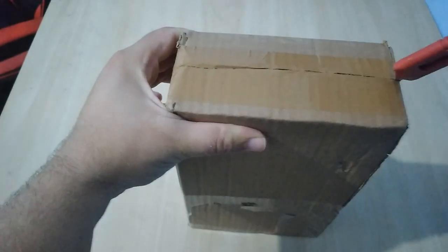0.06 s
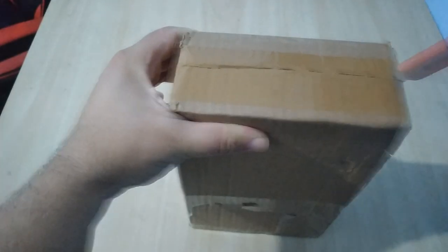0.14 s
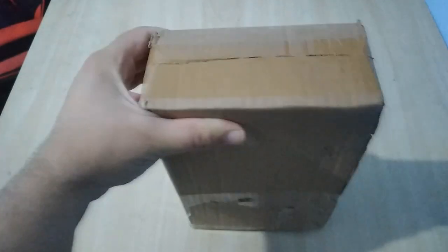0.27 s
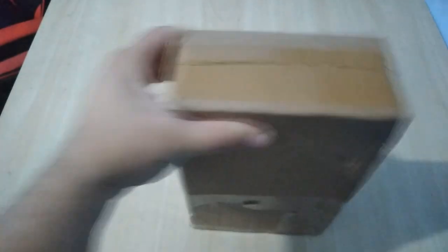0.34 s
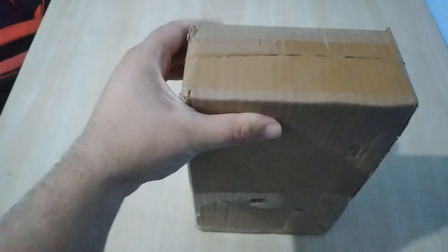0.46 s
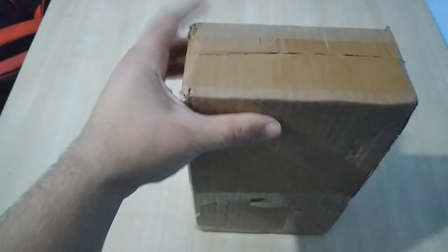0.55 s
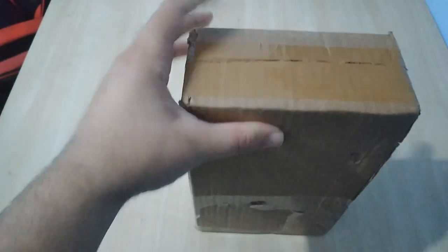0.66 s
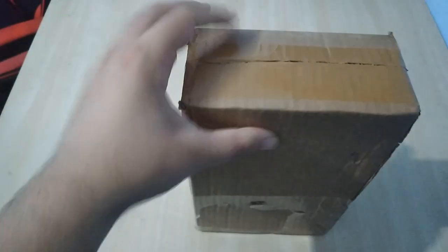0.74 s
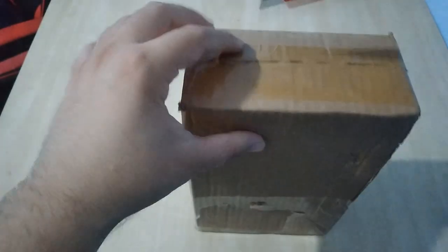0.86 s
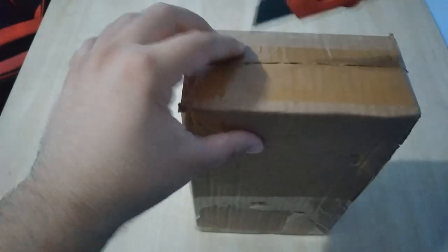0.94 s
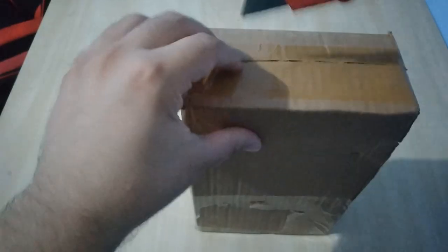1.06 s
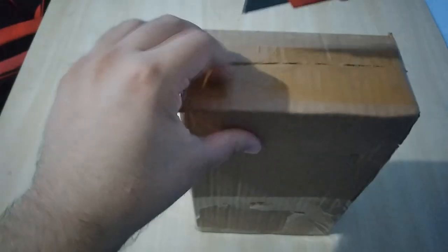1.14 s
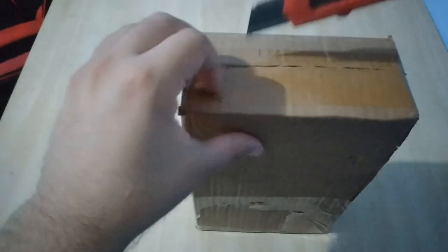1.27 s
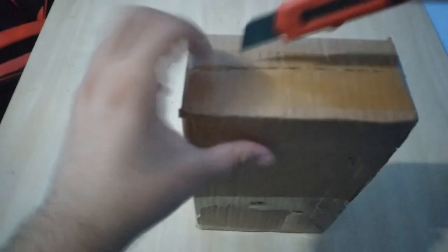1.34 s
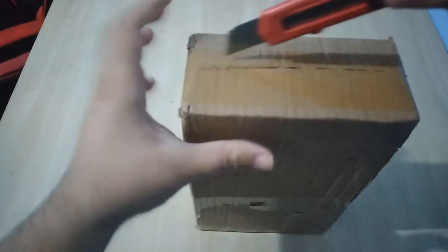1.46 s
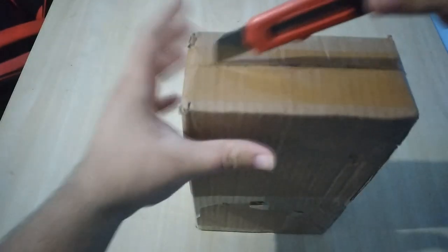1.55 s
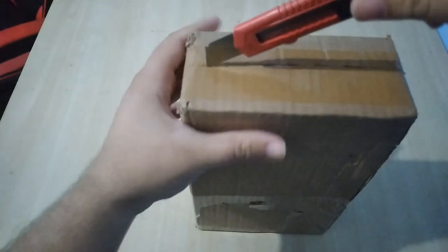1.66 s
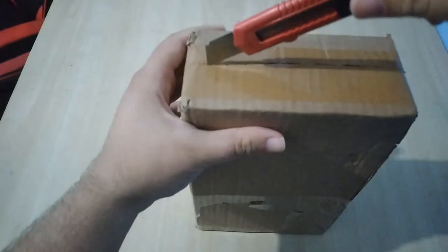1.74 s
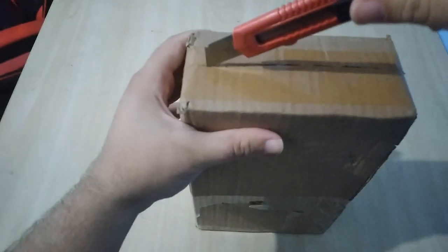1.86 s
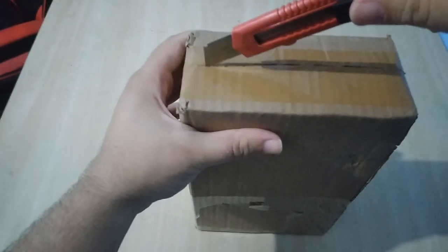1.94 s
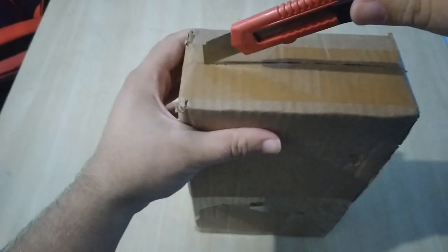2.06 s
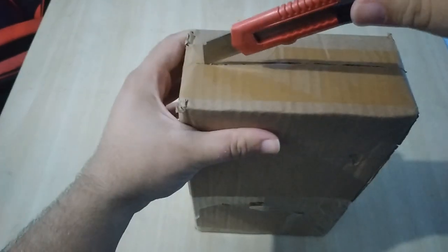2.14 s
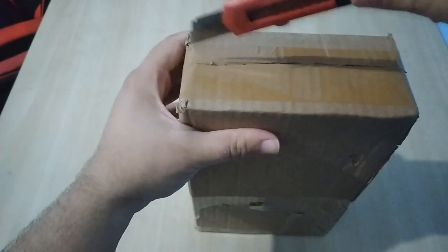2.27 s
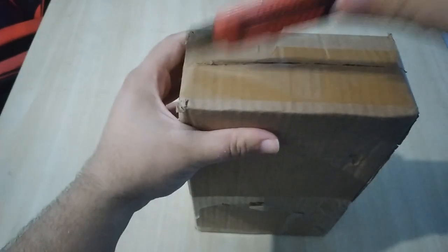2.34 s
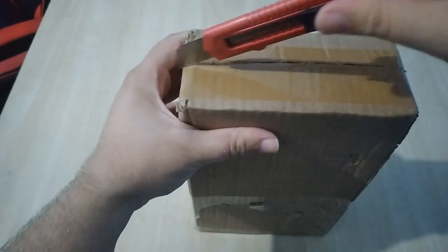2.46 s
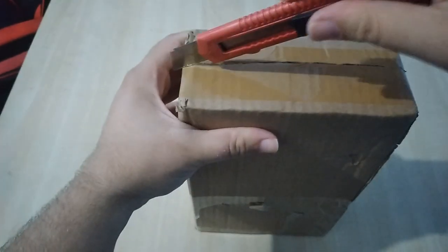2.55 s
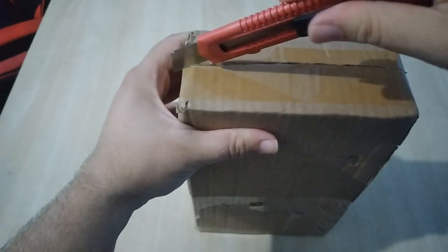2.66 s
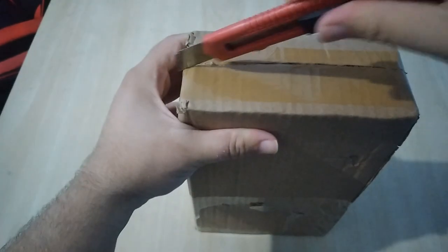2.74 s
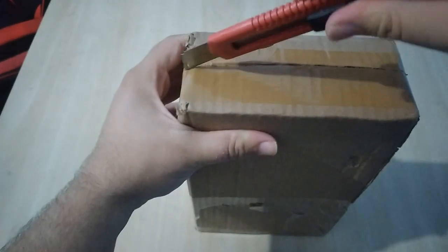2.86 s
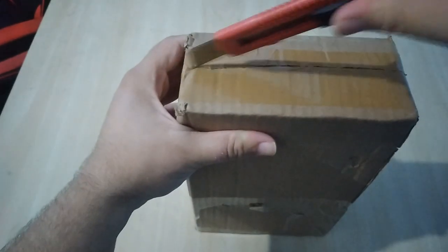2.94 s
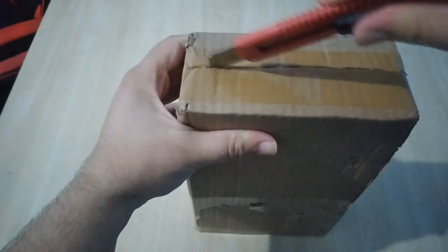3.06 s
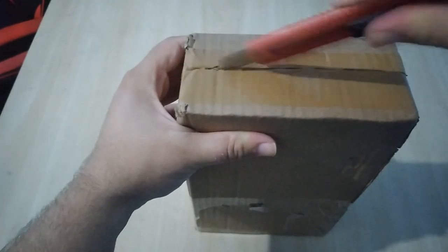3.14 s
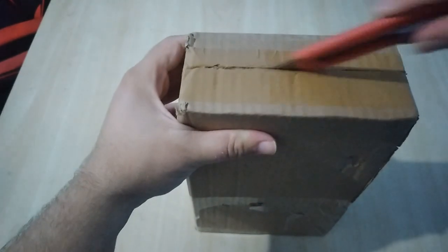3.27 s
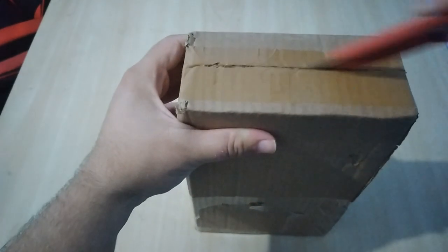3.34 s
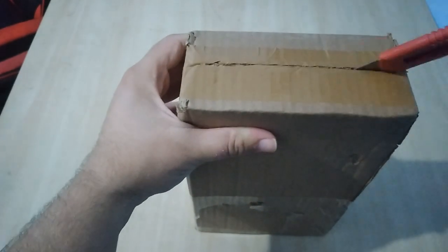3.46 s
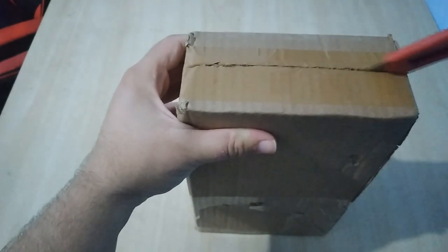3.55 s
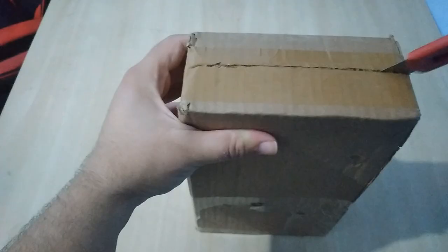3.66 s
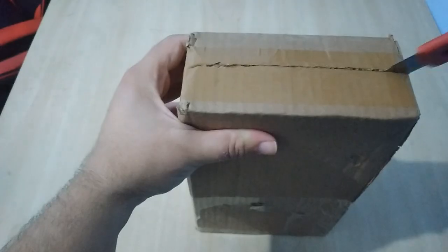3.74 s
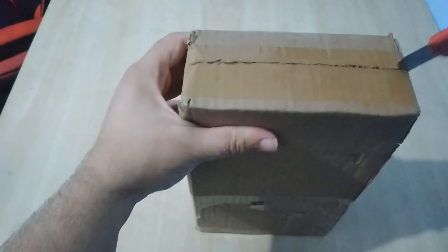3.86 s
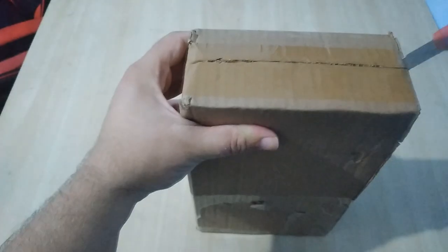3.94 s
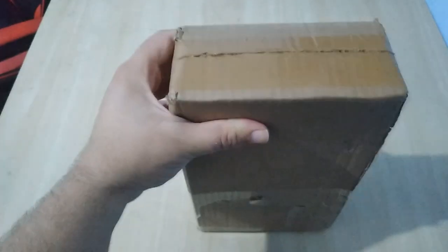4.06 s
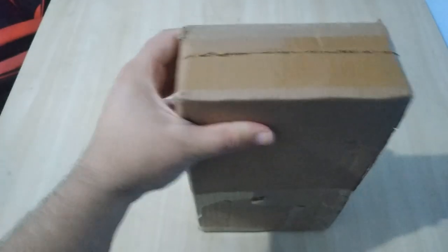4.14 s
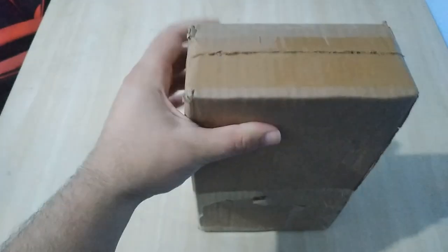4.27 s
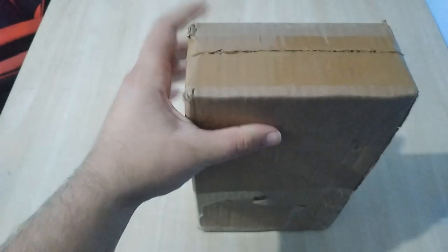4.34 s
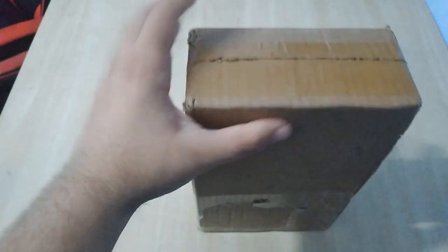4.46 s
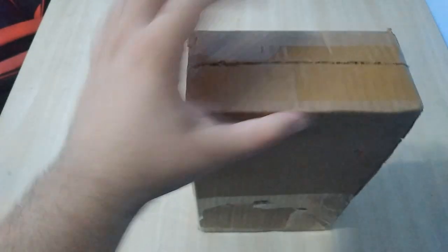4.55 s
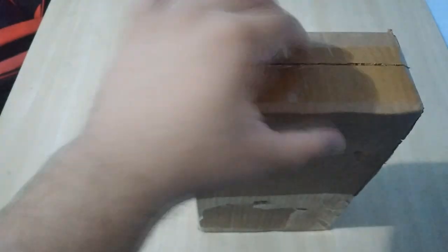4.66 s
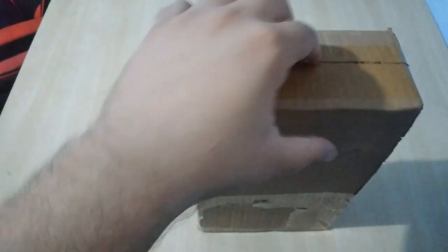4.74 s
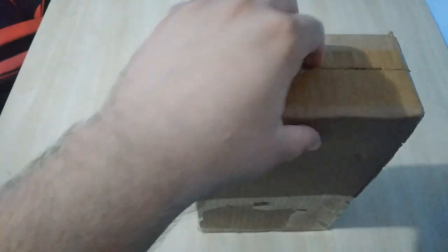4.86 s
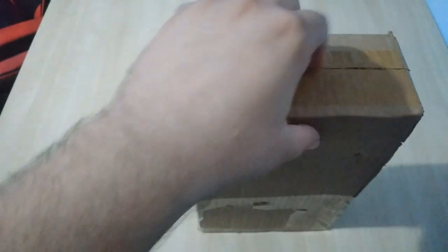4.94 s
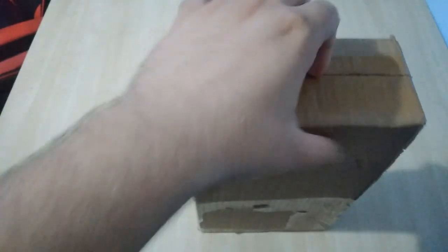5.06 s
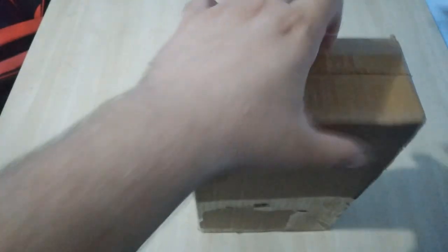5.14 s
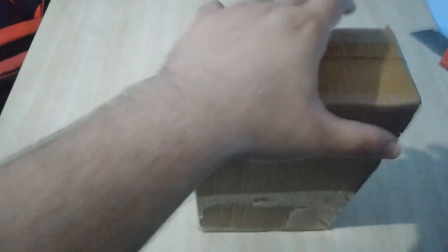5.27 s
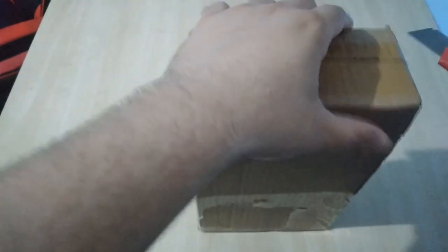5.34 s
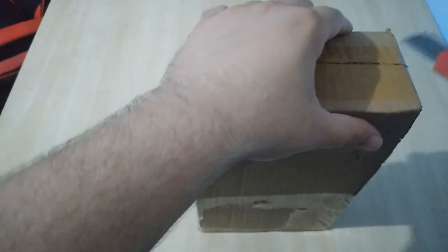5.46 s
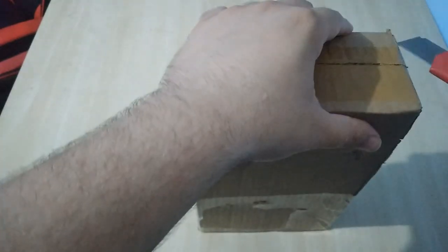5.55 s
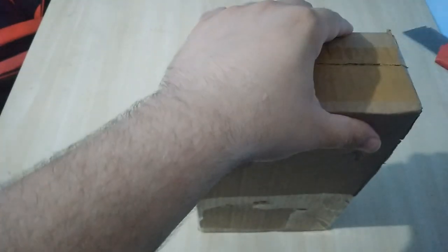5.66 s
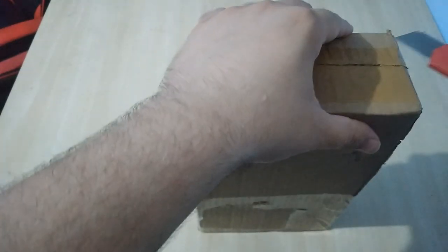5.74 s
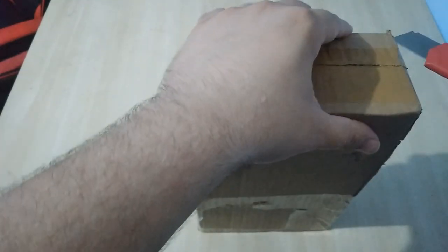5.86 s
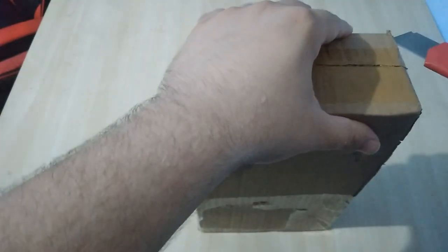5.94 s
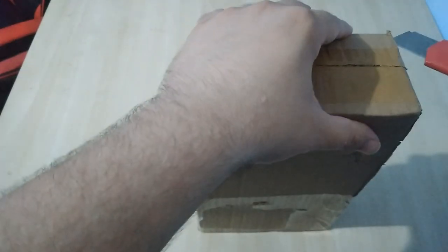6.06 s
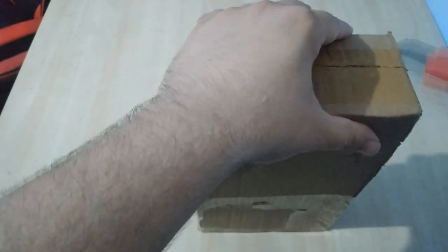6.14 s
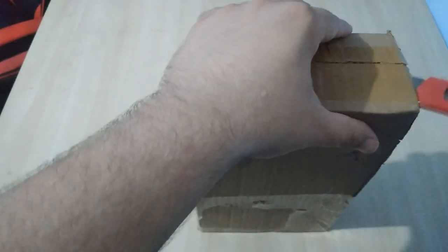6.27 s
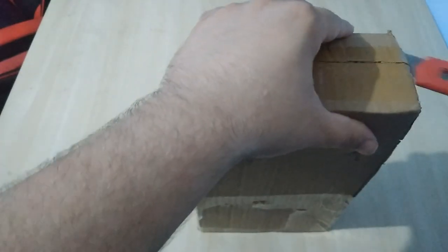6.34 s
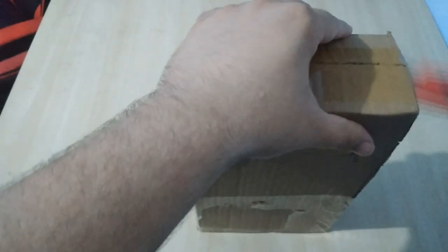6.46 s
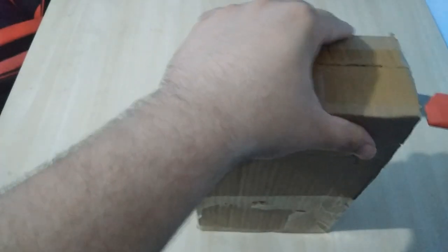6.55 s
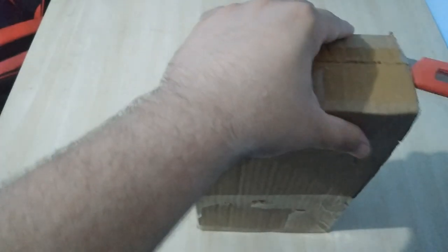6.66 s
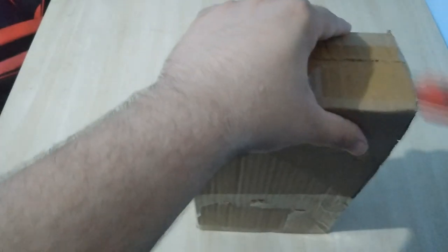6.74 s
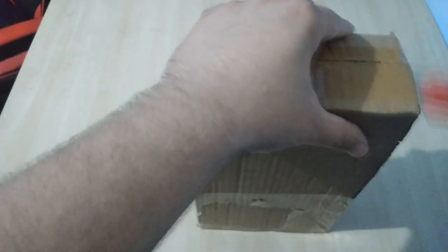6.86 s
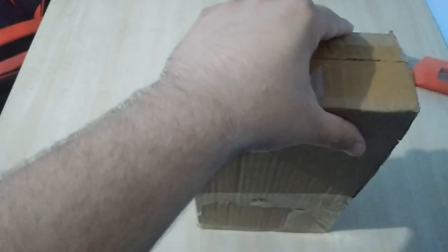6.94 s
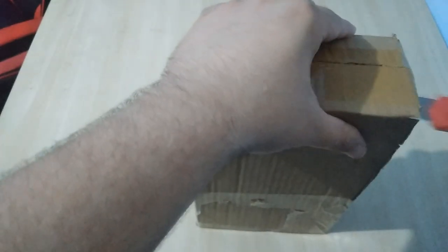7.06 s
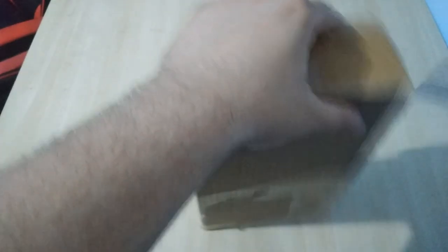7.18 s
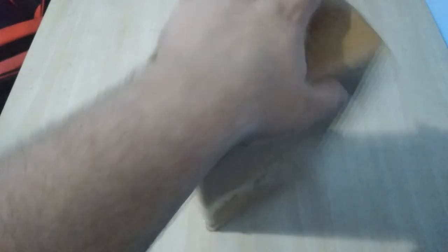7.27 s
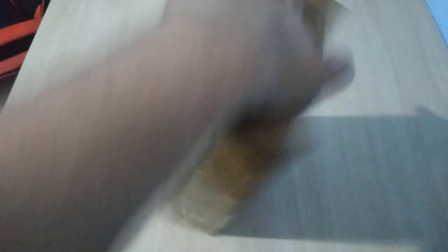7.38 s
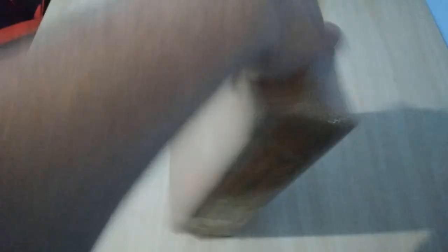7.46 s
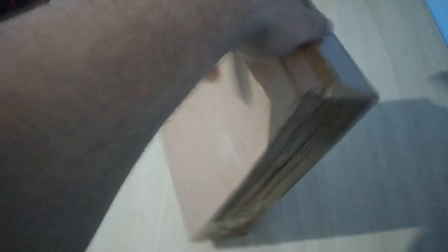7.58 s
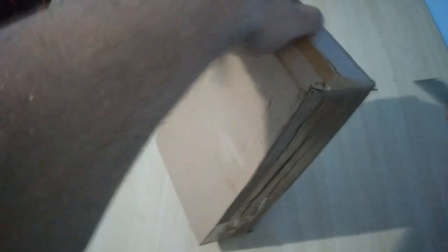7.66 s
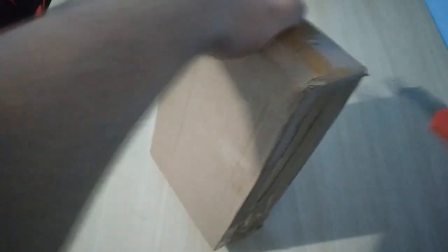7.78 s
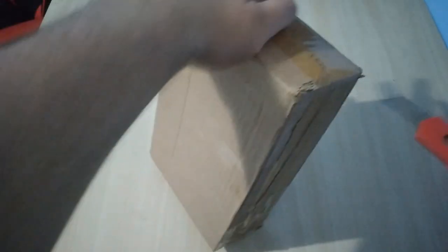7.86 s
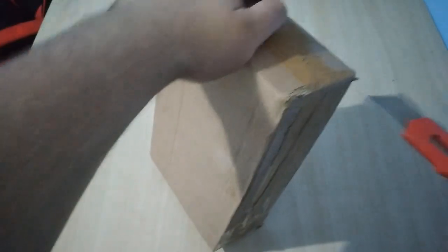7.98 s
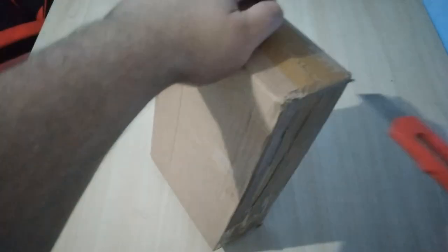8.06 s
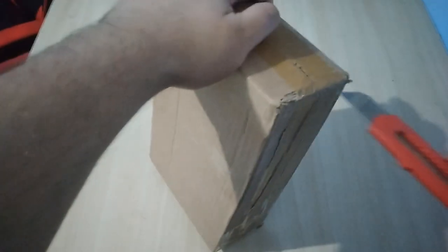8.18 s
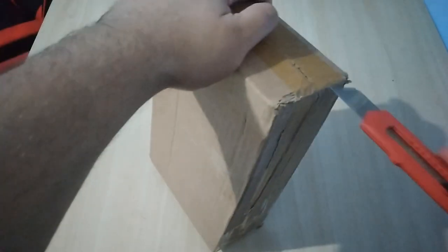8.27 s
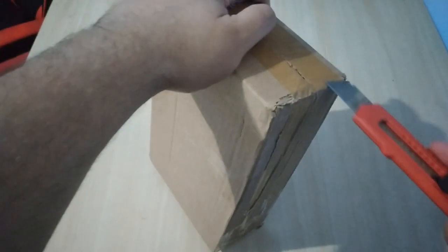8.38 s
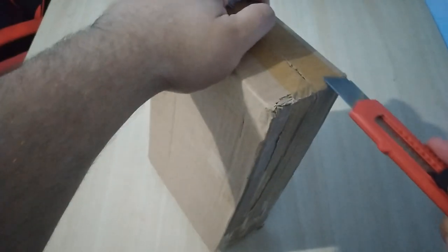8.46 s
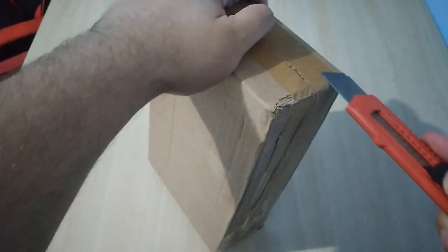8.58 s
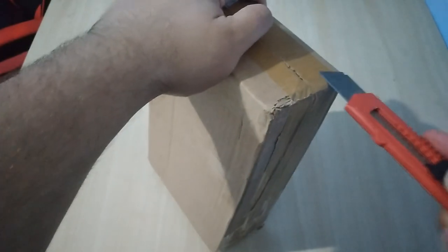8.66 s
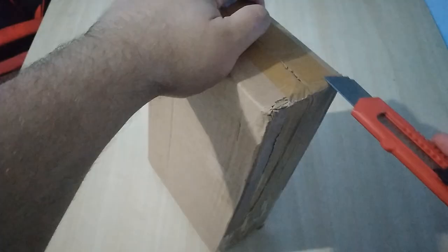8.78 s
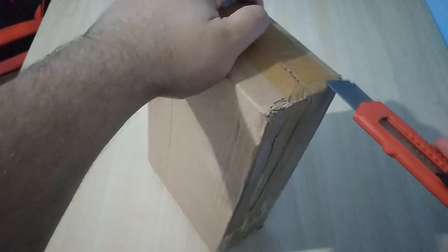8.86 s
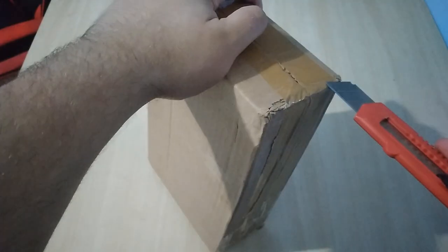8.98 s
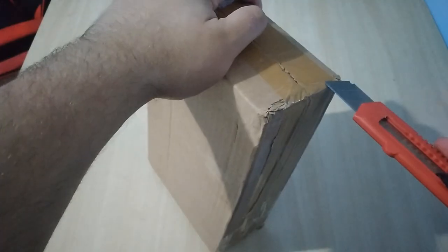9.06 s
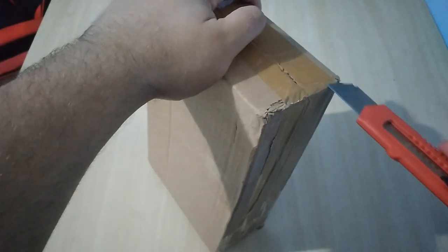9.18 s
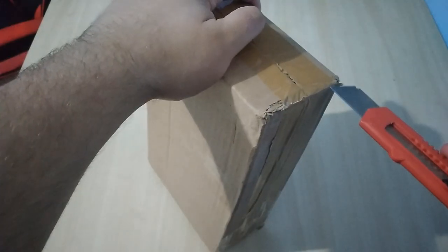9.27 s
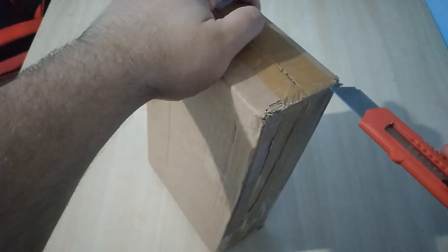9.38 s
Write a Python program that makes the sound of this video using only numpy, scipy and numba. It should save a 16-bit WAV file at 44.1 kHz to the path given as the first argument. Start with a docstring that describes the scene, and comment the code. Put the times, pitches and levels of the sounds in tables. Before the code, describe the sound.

A knife blade rips along taped cardboard in one long pull, then saws in short rasping strokes, with hollow box knocks and slides over low hum.

```python
"""A utility knife slits the packing tape of a small cardboard box: a long pull, sawing strokes, snaps.
In between come handling taps and rubs, knocks and slides of the box on a table, and a low room hum.
Friction is random grains of slip, coloured by the part that radiates them and shaped by event tables.
Snaps, slips and touches are short crackling bursts of noise; knocks and blade ticks ring decaying modes;
squeaks are sines. The sources feed a short room and two differently coloured microphones."""
import sys
import numpy as np
from scipy import signal
from scipy.fft import rfft, irfft, next_fast_len
from scipy.io import wavfile
from scipy.ndimage import uniform_filter1d, map_coordinates
from numba import njit

SR = 44100
rng = np.random.default_rng(int(sys.argv[2]) if len(sys.argv) > 2 else 0)


def to_wav(s):
    """Save 16-bit WAV."""
    ch = np.atleast_2d(s).T  # columns
    pcm = np.round(np.clip(ch, -1, 1) * 32767)  # PCM
    wavfile.write(sys.argv[1], SR, pcm.astype(np.int16))


N = 415414
TIME = np.arange(N) / SR

# spectra of the hollow box, the flaps, the tearing tape and the blade hiss: f/Hz, density/dB per Hz
BOX_DRONE = [(75, -12), (110, -8), (160, -8.5), (225, 0), (280, -11), (335, -8), (395, -9.5), (455, -11),
             (600, -18), (900, -30)]
FLAP_RASP = [(400, -6), (600, -7), (770, -1.5), (900, 3.5), (1150, -2.5), (1400, -8.5), (2100, -20)]
TAPE_TEAR = [(900, -16.5), (1400, -5.5), (1800, 3), (2300, 2), (2950, 0.5), (3600, -3.5), (4500, -5),
             (5400, -14.5), (7500, -26.5)]
FINE_HISS = [(3800, -13), (5600, -1.5), (7300, 1), (8900, 2), (10000, -7.5), (11500, -16.5), (15500, -25)]
# spectrum of a dull rub or tap on card: f/Hz, density/dB per Hz
DULL_CARD = [(200, 0), (330, 9.5), (620, -2.5), (810, 7), (1400, -7), (1900, -7), (3000, -26.5)]
# skin rubs over the box: t/s, hold time/s, level/dB, brightness/dB, ring of the rubbed spot f/Hz
SKIN_RUBS = [(0.893, 0.17, -75, 16, 3350), (1.169, 0.024, -63.5, -10, 1400), (1.213, 0.067, -74, -19, 990),
             (2.207, 0.022, -73.5, 11, 2870), (2.558, 0.027, -72, 10, 5400), (2.715, 0.047, -71, 1, 3000),
             (4.92, 0.12, -76, -17, 800), (5.148, 0.12, -64, -3, 1450), (5.295, 0.034, -70.5, 5, 3600)]
RUB_ATTACK_S, RUB_RELEASE_S = 0.0095, 0.0032
# left-right likeness of diffuse sound: f/Hz, likeness (1 = identical)
DIFFUSE_LIKENESS = [(40, 0.97), (250, 0.94), (600, 0.21), (1500, 0.059)]


def cutting():
    """The blade catches and slips through tape and card; the flaps and the hollow box sound along."""
    # the flap rings low in mid-seam and higher at the stiff edge: t/s, f/Hz
    flap_pitch = [(3.1, 1150), (3.19, 1006), (3.25, 762), (3.31, 623.5), (3.39, 800), (3.44, 950),
                  (3.5, 745), (3.66, 820), (3.9, 944), (6.15, 1120), (6.4, 1220), (6.55, 1004),
                  (6.75, 1146), (6.93, 1150), (7.2, 1030)]
    # radiation of the card as the blade chatters through it: f/Hz, density/dB per Hz
    chatter_colour = [(250, 0), (450, -2.5), (650, -5), (1000, 4.5), (1600, 3), (2300, -1), (3600, -6),
                      (5500, -13.5)]

    # the fibres grip unevenly
    catch = rms_one(from_db(1.9 * drift(170)))
    drone, rasp, tear, hiss = blade_drive()
    rasp = rasp * uneven(per_s=45, swing_db=2.2)
    tear = tear * uneven(per_s=70, swing_db=1.6)

    body = drone * colour(catch * grains(per_s=2900, spread_db=2.0), BOX_DRONE)
    flap_hz = np.interp(TIME, *np.transpose(flap_pitch))
    flaps = rasp * resonate(catch * grains(per_s=2100, spread_db=1.0), flap_hz, q=3.8)
    chatter = tear * from_db(-2) * colour(stick_slip(), chatter_colour)
    # even tearing of the tape, and single fibres parting
    tape = tear * from_db(-5) * colour(catch * grains(per_s=1800, spread_db=-3.5), TAPE_TEAR)
    crackle = tear * from_db(-7) * colour(catch * grains(per_s=260, spread_db=0.5), TAPE_TEAR)
    # the far corner of the box rings as the blade passes it
    passing_s, width_s = 3.64, 0.13
    near_corner = np.exp(-((TIME - passing_s) / width_s) ** 2)
    corner_ring = resonate(grains(per_s=3700, spread_db=-9.0), hz=1623, q=1.8)
    corner = tear * near_corner * from_db(2.5) * corner_ring
    edge = hiss * colour(catch * grains(per_s=6000, spread_db=-5.0), FINE_HISS)
    return body + flaps + chatter + tape + crackle + corner + edge


def blade_drive():
    """Gain of each part under the blade: one long pull, then sawing strokes that swell and die away."""
    # the long pull along the seam: t/s, bite level/dB, extra blade hiss level/dB
    pull_path = [(2.975, -79.5, -4), (3.001, -66.5, 1.5), (3.109, -58, -1), (3.188, -49.5, 5.5),
                 (3.25, -52, -0.5), (3.41, -48.5, 4), (3.44, -44, 0), (3.53, -48.5, -9), (3.6, -48, 3.5),
                 (3.669, -51.5, -8.5), (3.73, -47.5, 1), (3.8, -55.5, 2), (3.88, -57, 7), (3.99, -62, -1),
                 (4.02, -100, -1)]
    # share of box drone, flap rasp, tearing, blade hiss: level at the start/dB, change/dB per s
    pull_mix = [(10.5, -11), (1, -6), (-1.5, -0.5), (-6, -13)]
    # sawing strokes: t of the hardest bite/s, swell time/s, level/dB, brightness/dB
    saw_strokes = [(6.143, 0.0066, -62.5, 1.5), (6.213, 0.0238, -45.5, -4.5), (6.354, 0.025, -46.5, 2),
                   (6.395, 0.0069, -60.5, -3), (6.49, 0.0057, -50.5, -0.5), (6.525, 0.029, -49.5, -3.5),
                   (6.675, 0.017, -45.5, 3), (6.77, 0.024, -50, -0.5), (6.927, 0.024, -45.5, 1.5),
                   (7.023, 0.022, -48.5, -1.5), (7.095, 0.017, -47.5, 6), (7.16, 0.027, -54.5, 12),
                   (7.208, 0.0071, -52.5, 5)]
    # share of the same four parts: level/dB, slope/dB per dB of brightness
    stroke_mix = [(2, -1), (-1.5, -1), (-1, 0.14), (-9, 0.21)]
    release_ratio = 1.155  # dying away takes this many swell times
    roundness = 0.94       # 1 = pointed, 2 = bell-shaped

    s, db, extra_db = np.transpose(pull_path)
    bite_db = np.interp(TIME, s, db, left=-np.inf, right=-np.inf)
    travel_s = np.clip(TIME, s[0], s[-1]) - s[0]
    pull_db = [bite_db + start + change * travel_s for start, change in pull_mix]
    pull_db[-1] += np.interp(TIME, s, extra_db)

    sawing = 0
    for peak, swell, level, brightness in saw_strokes:
        away = np.maximum(peak - TIME, (TIME - peak) / release_ratio) / swell
        envelope = np.exp(-np.minimum(away, 10) ** roundness)
        sawing = sawing + from_db(shares(stroke_mix, level, brightness))[:, None] * envelope
    return from_db(pull_db) + sawing


def stick_slip():
    """The blade sticks and lets go at an uneven rate; each slip has its own size."""
    typical_per_s, jitter, spread_db = 190, 0.5, 3.6
    rate = typical_per_s * np.exp(jitter * drift(typical_per_s))
    count = np.floor(np.cumsum(rate) / SR)
    sizes = from_db(spread_db * rng.standard_normal((2, N))) * rng.choice([-1, 1], (2, N))
    return rms_one(np.diff(count, prepend=0) * sizes)


def blade_bursts():
    """Snaps and touches of the blade on tape and card, and slips off the box edge: quick crackling bursts."""
    # t/s, decay time/s, level/dB, brightness/dB, extra blade hiss level/dB
    burst_rows = [(0.163, 0.0035, -36.5, 4, -3), (2.9945, 0.0018, -48, -8, 14.5),
                  (3.026, 0.0011, -44.5, 6, 1), (3.088, 0.0033, -48, -4, 10),
                  (3.130, 0.0033, -43, -3.5, 5.5), (3.139, 0.0034, -42, -5.5, 12.5),
                  (3.163, 0.0066, -50, -9, 3.5), (3.177, 0.0045, -41.5, -4, 13),
                  (3.1815, 0.0051, -38, -11.5, -0.5), (3.196, 0.0041, -33.5, -5, 9),
                  (3.2032, 0.0015, -30, -8.5, -2), (3.423, 0.0043, -47, 2, 5),
                  (3.467, 0.0042, -41, -2, -6.5), (3.614, 0.004, -44.5, 1.5, -3),
                  (3.694, 0.0021, -27.5, 4.5, -12), (3.9938, 0.0016, -30.5, 0.5, -6.5),
                  (6.1255, 0.0043, -47, -4.5, 4), (6.176, 0.014, -42.5, 3.5, -1),
                  (6.183, .003, -36.5, -1, -5), (6.205, 0.0033, -44.5, -3.5, 2.5),
                  (6.2253, 0.0013, -34, 0, 3.5), (6.367, 0.0023, -51.5, -9, -2),
                  (6.468, 0.0044, -53.5, 4, -8.5), (6.521, .003, -50, 3, -0.5),
                  (6.534, 0.0043, -46, 3.5, -2.5), (6.63, 0.0013, -52.5, 8, -3.5),
                  (6.661, 0.0023, -48.5, -2, 9), (6.746, 0.013, -46.5, 9, -7.5),
                  (6.788, 0.0016, -28.5, 8, 4), (6.9255, 0.0023, -44, -6.5, 11), (6.982, 0.0031, -47, 0, 0),
                  (7.008, 0.0037, -50.5, -2.5, -5), (7.042, 0.0028, -33, 16.5, -7),
                  (7.106, 0.0024, -48.5, 1.5, -9), (7.235, 0.0023, -55, 1, -10)]
    # share of box drone, flap rasp, tearing, blade hiss: level/dB, slope/dB per dB of brightness
    burst_mix = [(-7, -1.82), (4.5, -0.8), (-0.5, 0), (-11, 0.96)]
    spectra = [BOX_DRONE, FLAP_RASP, TAPE_TEAR, FINE_HISS]
    return bursts(burst_rows, spectra, burst_mix, rise_s=0.0019, main_click=0.85)


def blade_ticks():
    """The blade flicks off the box, breaks through or ticks in its holder: gritty slips ring the steel."""
    # t/s, peak level/dB, main ring f/Hz, its t60/s
    tick_rows = [(0.163, -22, 4300, 0.0069), (3.6953, -15.5, 1670, 0.01), (3.995, -23, 4360, .004),
                 (5.565, -49, 3520, 0.013), (5.643, -46, 3520, .003), (5.922, -47.5, 3590, 0.0051),
                 (6.788, -19, 3620, .014), (7.043, -18.5, 3520, 0.014), (9.366, -47.5, 1300, 0.0095),
                 (9.378, -43.5, 3900, 0.0068)]
    # modes of the knife: f/Hz, level/dB, t60/s
    steel_modes = [(850, -13.5, 0.0043), (2470, -11.5, 0.0036), (3100, -15, 0.0022), (5600, -17.5, 0.0028)]

    out, t = np.zeros(N), TIME[:SR // 5]
    soft = signal.butter(2, 9000, fs=SR, output="sos")
    for s, db, hz, t60 in tick_rows:
        slip = rng.standard_normal(len(t)) * np.exp(-t / 0.002) + 9.0 * (t == 0)
        main_ring = (hz, -3, t60)
        sound = ring(signal.sosfilt(soft, slip), [*steel_modes, main_ring])
        add(out, s, from_db(db) * sound / np.abs(sound).max())
    return out


def squeaks():
    """The knife squeaks faintly on wavering sine partials that may rise once the blade starts to slip."""
    # t/s, hold time/s, level/dB
    squeak_rows = [(5.561, 0.01, -75), (5.718, 0.03, -74), (5.778, 0.055, -81), (5.85, .04, -91)]
    # partials: starting f/Hz, level/dB, rise/Hz per s
    partials = [(3505, 0, 0), (4387, -9, 0), (5880, -2, 7000)]
    slip_start_s, waver_hz, edge_s = 5.74, 35, 0.006

    pressure = sum(from_db(db) * held(s, length, edge_s, edge_s) for s, length, db in squeak_rows)
    slipping_s = np.clip(TIME - slip_start_s, 0, 0.5)
    lines = 0
    for hz, db, rise in partials:
        pitch = hz + rise * slipping_s + waver_hz * drift(170)
        lines = lines + from_db(db) * np.sin(2 * np.pi * np.cumsum(pitch) / SR)
    return pressure * rms_one(lines)


def knocks():
    """The box meets the table: a soft push rings both, and longer contacts are duller."""
    # t/s, contact time/s, hollow box peak level/dB, table thud peak level/dB
    knock_rows = [(0.163, 0.0037, -21, -51), (0.378, 0.003, -42.5, -34), (2.998, 0.0049, -27.5, -46),
                  (3.205, 0.0017, -29, -51), (3.444, 0.004, -32.5, -25), (3.473, 0.0055, -23, -23.5),
                  (3.5, 0.014, -41, -34), (3.695, 0.0021, -38, -58.5), (3.9934, 0.0023, -20.5, -68.5),
                  (6.1219, 0.0021, -28, -48.5), (6.2025, 0.0033, -23.5, -47.5), (6.794, 0.0036, -33, -61),
                  (7.049, 0.0032, -30.5, -50), (7.104, 0.0012, -47, -34), (7.47, 0.0057, -35, -39),
                  (7.994, 0.0058, -37, -52)]
    # modes of the box and of the table top: f/Hz, level/dB, t60/s
    box_modes = [(253, -2, 0.029), (254, 0, 0.05), (368, -5.5, 0.027), (380, -7, 0.059),
                 (454.4, -5.5, 0.045), (795, 3.5, 0.051), (1160, -2.5, .03)]
    table_modes = [(40, -8.5, 0.29), (70, -8, 0.45), (94.6, 5, 0.14)]

    out = np.zeros(N)
    for s, contact, box_db, table_db in knock_rows:
        push = np.sin(np.pi * np.minimum(TIME[:SR // 3] / contact, 1)) ** 2
        # small light panels radiate the change of the push
        panels = ring(np.gradient(push), box_modes)
        top = ring(push, table_modes)
        add(out, s, from_db(box_db) * panels / np.abs(panels).max())
        add(out, s, from_db(table_db) * top / np.abs(top).max())
    return out


def handling():
    """Fine, even friction of card on table and of skin on card."""
    # the box slides on the table: t/s, hold time/s, level/dB, brightness/dB
    slide_rows = [(0.1, 0.37, -85.5, 6.5), (0.135, 0.18, -71, -0.5), (0.17, 0.064, -61, -1),
                  (0.375, 0.05, -65, 0), (0.415, 0.026, -77.5, 3), (0.44, 0.084, -75.5, -1),
                  (0.48, 0.11, -78.5, 3), (.55, 0.051, -90, 5.5), (.6, 0.061, -92.5, 5.5),
                  (4.0, 0.14, -61, -0.5), (4.01, 0.029, -67, -0.5), (7.24, 0.27, -60.5, 0),
                  (7.458, 0.024, -62.5, 2), (7.5, 0.089, -66, 0.5), (7.575, 0.269, -61.5, 0),
                  (7.67, 0.104, -72.5, 2.5), (7.85, 0.058, -78.5, 3), (7.91, .05, -92.5, 6),
                  (7.99, 0.021, -84, 5)]
    # share of dull rub, scuff, hiss in a slide and in a skin rub: level/dB, slope/dB per dB of brightness
    slide_mix = [(-3.5, -10.5), (-4.5, 3.5), (-10.5, 1.45)]
    rub_mix = [(4.5, -0.59), (-4, 0.72), (-24, 1)]
    # spectrum of scuffed card: f/Hz, density/dB per Hz
    scuff_colour = [(700, -7.5), (1150, -9.5), (1700, 6.5), (2600, 6.5), (3400, 2), (4600, 0), (5600, -5.5),
                    (7500, -12.5)]

    catch = rms_one(from_db(1.0 * drift(90)))
    dull, mid, top = rub_drive(slide_rows, slide_mix) + rub_drive(SKIN_RUBS, rub_mix)
    rub = dull * colour(catch * grains(per_s=3200, spread_db=-2.5), DULL_CARD)
    scuff = mid * colour(catch * grains(per_s=5600, spread_db=0.5), scuff_colour)
    hiss = top * colour(catch * grains(per_s=9000, spread_db=1.0), FINE_HISS)
    # the big panels of the box groan along with the scuffing
    panel_groan = resonate(grains(per_s=900, spread_db=1.5), hz=1150, q=2.5)
    base = mid * from_db(-9) * uneven(per_s=32, swing_db=3.5) * panel_groan
    return rub + scuff + base + hiss


def rub_drive(rows, mix):
    """Gain of each part under rubbing: every move starts, keeps its speed and stops."""
    drive = 0
    for s, length, db, brightness, *_ in rows:
        envelope = held(s, length, RUB_ATTACK_S, RUB_RELEASE_S)
        drive = drive + from_db(shares(mix, db, brightness))[:, None] * envelope
    return drive


def touches():
    """Fingers and blade touch the taped card: each contact is a dull tap with a crackle."""
    # t/s, decay time/s, level/dB, brightness/dB
    touch_rows = [(0.005, 0.0065, -59, 7), (0.2775, 0.0013, -50, 29), (0.372, 0.0024, -62, -7),
                  (0.796, 0.015, -67, 20), (0.819, 0.0081, -65, 18), (0.838, 0.0069, -57.5, 12),
                  (0.8855, 0.0068, -57, 8), (0.9153, 0.0029, -48, 28), (0.943, 0.0057, -48, 14),
                  (0.9873, 0.0041, -49, 9), (1.079, 0.0068, -66.5, -17), (1.225, 0.017, -83.5, -28),
                  (1.5915, 0.012, -65, -5.5), (2.187, 0.006, -67.5, -15), (2.199, 0.0029, -53.5, -2.5),
                  (2.542, 0.0031, -55, 23), (2.708, 0.0046, -63.5, -4), (2.95, 0.016, -65, -9),
                  (4.737, 0.0054, -65, -13), (4.24, 0.02, -73.5, -12), (4.966, 0.0064, -72.5, -21.5),
                  (4.9995, 0.012, -72, -21.5), (5.0485, 0.0031, -72.5, -20.5), (5.327, 0.0077, -73.5, -12),
                  (5.777, .012, -68, -8.5), (9.364, 0.017, -66.5, 20)]
    # share of dull tap, crackle: level/dB, slope/dB per dB of brightness
    touch_mix = [(-.5, -1), (-.5, 0)]
    # spectrum of the crackle: f/Hz, density/dB per Hz
    crisp_colour = [(1100, -25.5), (1900, 5.5), (3000, 4), (4400, -1), (5600, -3.5), (9000, -5),
                    (11500, -25.5), (15500, -32)]
    return bursts(touch_rows, [DULL_CARD, crisp_colour], touch_mix, rise_s=0.0018, main_click=4.8)


def skin():
    """Each rub of the hand rings the spot of card that it touches."""
    pressure, spots = 0, []
    for s, length, db, _, hz in SKIN_RUBS:
        pressure = pressure + from_db(db - 1) * held(s, length, RUB_ATTACK_S, RUB_RELEASE_S)
        spots += [(s, hz), (s + length, hz)]
    spot_hz = np.interp(TIME, *np.transpose(spots))
    return pressure * resonate(grains(per_s=600, spread_db=-1.0), spot_hz, q=2.2)


def turning():
    """The dragging edge judders: the panel above it groans at a shifting pitch and the table rumbles."""
    # t/s, groan level/dB, groan f/Hz, table rumble level/dB
    turn_path = [(7.3, -69, 1500, -66), (7.43, -66, 1150, -68), (7.475, -64, 2190, -51),
                 (7.55, -76, 2180, -55), (7.58, -62.5, 950, -56), (7.66, -60, 800, -67.5),
                 (7.7, -64.5, 1400, -69), (7.79, -68.5, 1300, -75), (7.86, -71, 1886, -70)]
    s, groan_db, groan_hz, rumble_db = np.transpose(turn_path)
    groan = from_db(np.interp(TIME, s, groan_db, left=-np.inf, right=-np.inf))
    rumble = from_db(np.interp(TIME, s, rumble_db, left=-np.inf, right=-np.inf))
    judder = grains(per_s=450, spread_db=1.5)
    panel = resonate(judder, np.interp(TIME, s, groan_hz), q=1.2)
    table = resonate(judder, hz=137.7, q=1.65)
    return groan * panel + rumble * table


def room(x, sent):
    """Direct sound with a moving lag, standing waves that hang on, and a tail that dies band by band."""
    # decay of the tail: f/Hz, t60/s
    tail_t60 = [(100, 0.89), (400, 0.1), (1000, 0.2), (3000, 0.16), (7000, 0.23), (15000, 0.32)]
    # strength of the tail: f/Hz, level/dB
    tail_level = [(100, -7), (400, 2), (1000, -1), (3000, 1), (8000, -0.5), (15000, -1.5)]
    # standing waves: f/Hz, level at the resonance/dB, t60/s
    standing_modes = [(216, 3, .33), (330, 5, .36), (453, 4, .26), (572, 3, .3), (775, 6, .2)]
    # lag of the right microphone as the point of contact moves along the box: t/s, lag/ms
    right_lag = [(.16, .17), (.9, .12), (2.2, -.15), (3.25, -.13), (3.55, .03), (3.7, .2), (5.2, .22),
                 (6.2, .04), (6.6, .08), (6.79, .21), (7.1, .21), (7.5, -.1)]

    t = TIME[:SR * 2 // 3]
    edges = np.geomspace(60, 16000, 9)
    diffuse = two_ears(rng.standard_normal((2, len(t))), DIFFUSE_LIKENESS)
    echo = np.zeros((2, len(t)))
    for low, high in zip(edges, edges[1:]):
        band = signal.butter(2, [low, high], "band", fs=SR, output="sos")
        hz = np.sqrt(low * high)
        decay = np.exp(-np.log(1000) * t / at_hz(tail_t60, hz)) * (t > 0.005)
        tail = signal.sosfilt(band, diffuse * decay) / np.linalg.norm(decay)
        echo += from_db(at_hz(tail_level, hz)) * tail

    lag_s = np.interp(TIME, *np.transpose(right_lag)) / 1000
    direct = np.array([x[0], map_coordinates(x[1], [(TIME - lag_s) * SR], order=3)])
    standing = 0
    for hz, db, t60 in standing_modes:
        unit_gain = 2 * np.log(1000) / (t60 * SR)
        standing = standing + ring(sent.mean(axis=0), [(hz, db, t60)]) * unit_gain
    return direct + standing + signal.oaconvolve(sent, echo, axes=1)[:, :N]


def background():
    """A low rumble of coloured noise, with hum lines that waver in level and phase."""
    # spectrum of the rumble: f/Hz, density/dB per Hz
    floor_colour = [(20, -8.5), (38, -3.5), (52, -4), (66, -14.5), (80, -1.5), (110, 1), (165, -6.5),
                    (230, -11.5), (500, -20), (950, -34.5), (1600, -42.5), (4000, -52), (8000, -59),
                    (16000, -68.5)]
    # hum lines: f/Hz, rms level/dB
    hum_lines = [(38, -54.5), (66, -62.5), (102, -56.5), (131, -59), (214, -74.5)]
    noise = two_ears(rng.standard_normal((2, N)), DIFFUSE_LIKENESS)
    rumble = from_db(-52) * colour(noise, floor_colour)
    hum = 0
    for hz, db in hum_lines:
        phase = 2 * np.pi * hz * TIME
        hum = hum + from_db(db) * (drift(12) * np.cos(phase) + drift(18) * np.sin(phase))
    return rumble + hum


def bursts(rows, spectra, mix, rise_s, main_click):
    """Each event is a short run of noise round one main click, each part at its own level."""
    out = np.zeros((2, N))
    t = TIME[:SR // 10]
    parts = [response(points) for points in spectra]
    for s, length, level, brightness, *extra_hiss in rows:
        levels = shares(mix, level, brightness)
        levels[-1] += sum(extra_hiss)
        envelope = np.exp(-t / length) * (1 - np.exp(-t / rise_s))
        crackles = rng.standard_normal((len(parts), 2, len(t))) * envelope
        crackles[:, 0, int(length * SR / 2)] += main_click
        for part, run, db in zip(parts, crackles, levels):
            sound = signal.fftconvolve(run, part[None], axes=1)
            sound /= np.linalg.norm(sound, axis=1, keepdims=True)
            # the level is the rms over one decay time
            add(out, s, from_db(db) * np.sqrt(length * SR) * sound)
    return out


def grains(per_s, spread_db):
    """Tiny slips at random moments in two patches; a few are far bigger (negative spread: smaller)."""
    sizes = from_db(spread_db * np.minimum(rng.exponential(1, N), 5))
    signs = rng.choice([-1, 1], (2, N))
    return rms_one(sizes * signs * (rng.random(N) < per_s / SR))


def resonate(pair, hz, q):
    """Pass grains twice through a patch of card that rings at a steady or moving pitch; rms 1."""
    step = 2 * np.sin(np.pi * np.minimum(hz, SR / 8) / SR) * np.ones(N)
    damping = 1 / max(q, 1)
    rung = [tuned_filter(tuned_filter(x, step, damping), step, damping) for x in pair]
    return rms_one(np.array(rung) / np.sqrt(step))


@njit
def tuned_filter(x, step, damping):
    """A band-pass whose centre may move from sample to sample."""
    out, low, band = np.zeros(len(x)), 0., 0.
    for i in range(len(x)):
        low += step[i] * band
        band += step[i] * (x[i] - low - damping * band)
        out[i] = band
    return out


def ring(force, modes):
    """Decaying sines set going by a force."""
    out = 0
    for hz, db, t60 in modes:
        r, w = np.exp(-np.log(1000) / (t60 * SR)), 2 * np.pi * hz / SR
        poles = [1, -2 * r * np.cos(w), r * r]
        # the tiny offset keeps the filter clear of slow denormal numbers
        out = out + from_db(db) * signal.lfilter([0, np.sin(w)], poles, force + 1e-18)
    return out


def response(points, closed=True, size=4096):
    """Causal impulse response of a spectrum; a closed one falls away past its ends and has unit energy."""
    hz = np.maximum(np.fft.rfftfreq(size, 1 / SR), 1)
    octaves_outside = np.abs(np.log2(hz / np.clip(hz, points[0][0], points[-1][0])))
    level_db = at_hz(points, hz) - 20 * closed * np.minimum(octaves_outside, 2)
    # folding the cepstrum gives minimum phase
    cepstrum = irfft(np.log(from_db(level_db)))
    fold = 1 + np.sign(np.fft.fftfreq(size))
    h = irfft(np.exp(rfft(cepstrum * fold)))[:size // 2]
    return h / np.linalg.norm(h) if closed else h


def colour(x, points, closed=True):
    """Pass each row of a signal through a spectrum."""
    return signal.oaconvolve(x, response(points, closed)[None], axes=1)[:, :N]


def uneven(per_s, swing_db):
    """The card is stiffer in some places than others, so each part swells and fades on its own."""
    return rms_one(from_db(swing_db * drift(per_s)))


def drift(rate):
    """Smooth random curve of unit rms through a given number of random points per second."""
    coarse = TIME[::50]
    smooth = map_coordinates(rng.standard_normal(4096), [coarse * rate], order=2, mode="wrap")
    return np.interp(TIME, coarse, rms_one(smooth))


def held(s, length, attack_s, release_s):
    """An envelope that swells up to a time, holds, then dies away."""
    before = np.maximum(s - TIME, 0)
    after = np.maximum(TIME - s - length, 0)
    return np.exp(-before / attack_s - after / release_s)


def shares(mix, db, brightness):
    """Level of each part in an event: brightness tilts the balance by the slope of each part."""
    return [db + offset + slope * brightness for offset, slope in mix]


def two_ears(pair, likeness):
    """Left and right from two unrelated signals, as alike in each frequency range as the table says."""
    length = pair.shape[1]
    size = next_fast_len(length)
    mid, side = rfft(pair, size)
    alike = np.clip(at_hz(likeness, np.fft.rfftfreq(size, 1 / SR)), 0, 1)
    common = np.sqrt((1 + alike) / 2) * mid
    opposed = np.sqrt((1 - alike) / 2) * side * [[1], [-1]]
    return irfft(common + opposed, size)[:, :length]


def suppress(x, threshold_db, depth_db):
    """A noise suppressor turns the treble down whenever it is faint, which cuts tails short."""
    high_pass = signal.butter(3, 1100, "high", fs=SR, output="sos")
    treble = signal.sosfiltfilt(high_pass, x)
    power = uniform_filter1d(np.mean(treble ** 2, axis=0), SR // 100)
    level_db = 10 * np.log10(np.maximum(power, 1e-14))
    # fully shut 4 dB below the threshold
    shut = np.clip((threshold_db - level_db) / 4, 0, 1)
    return x + treble * (from_db(-depth_db * shut) - 1)


def add(track, s, piece):
    """Mix a short piece in at a time."""
    i = max(int(s * SR), 0)
    track[..., i:i + piece.shape[-1]] += piece[..., :N - i]


def at_hz(points, hz):
    """Read a table on a log-frequency axis."""
    f, value = np.transpose(points)
    return np.interp(np.log(np.maximum(hz, 1)), np.log(f), value)


def from_db(db):
    """Decibels to gain."""
    return 10 ** (np.asarray(db) / 20)


def rms_one(x):
    """Scale to unit rms."""
    return x / np.sqrt(np.mean(x ** 2) + 1e-20)


def scene():
    """Friction spreads over the faces of the box; everything sounds into the room, the nearby knife least."""
    # left-right likeness of the direct friction: f/Hz, likeness (1 = identical)
    friction_likeness = [(40, 0.9), (250, 0.97), (600, 0.36), (1200, 1), (3000, 0.17), (15000, 0.4)]
    contact = cutting() + blade_bursts() + handling() + touches() + skin() + turning()
    friction = two_ears(contact, friction_likeness)
    box = knocks()
    blade = blade_ticks() + squeaks()
    sent = from_db(-1.5) * friction + box + from_db(-11) * blade
    return room(friction + box + blade, sent) + background()


def record(dry):
    """Each microphone has its own colour; faint treble is suppressed and the top is cut."""
    # colour of the two microphones: f/Hz, level/dB
    left_colour = [(60, 1), (250, 1.5), (500, 2.5), (1200, 0.5), (3500, 6), (5500, 1), (7500, -7),
                   (9500, -11), (12000, -1), (15000, -2)]
    right_colour = [(60, -5), (250, -3.5), (500, -0.8), (1200, -5), (3500, 1), (5500, -1), (7500, 1.5),
                    (9500, 4.5), (12000, 3), (15000, 3)]
    left = colour(dry[:1], left_colour, closed=False)
    right = colour(dry[1:], right_colour, closed=False)
    heard = suppress(np.vstack([left, right]), threshold_db=-61.5, depth_db=5.0)
    top_cut = signal.ellip(10, 0.1, 70, 15800, fs=SR, output="sos")
    return signal.sosfilt(top_cut, heard)


dry = scene()
out = record(dry)
to_wav(out)
```